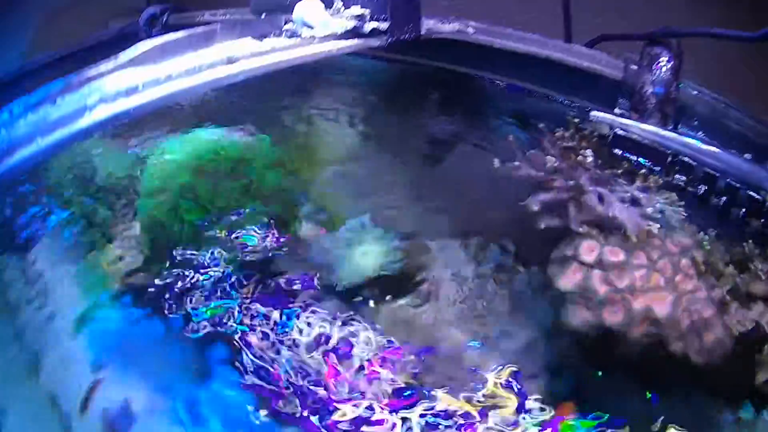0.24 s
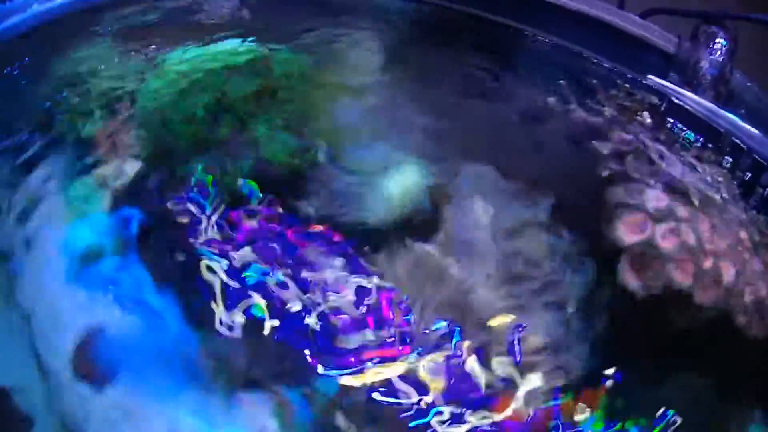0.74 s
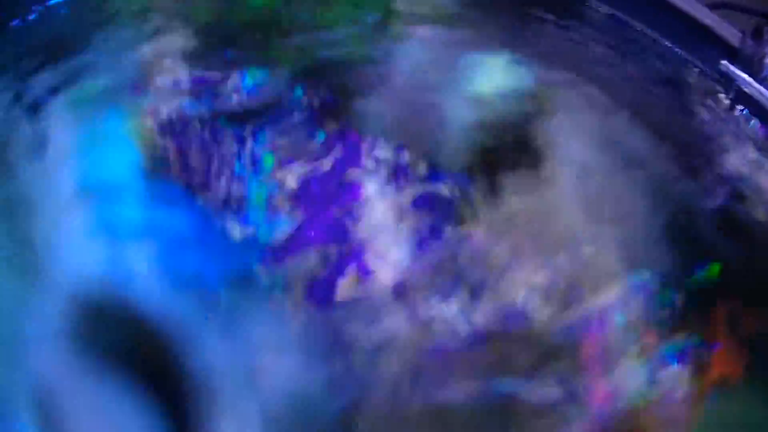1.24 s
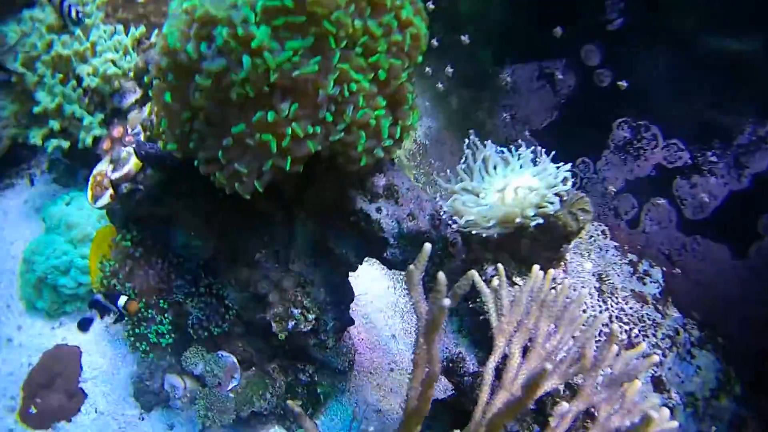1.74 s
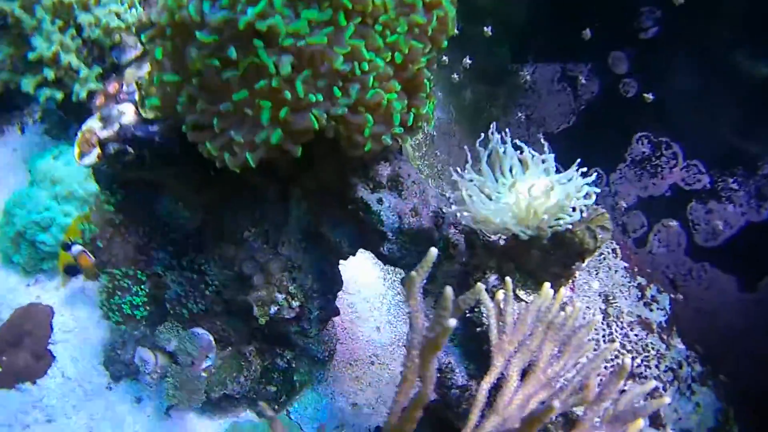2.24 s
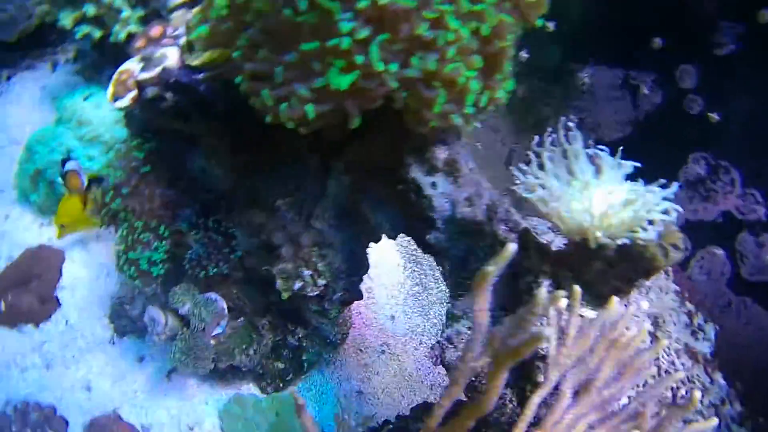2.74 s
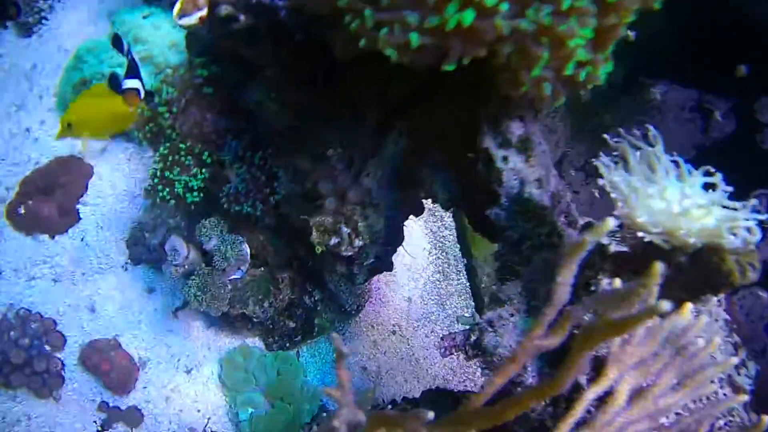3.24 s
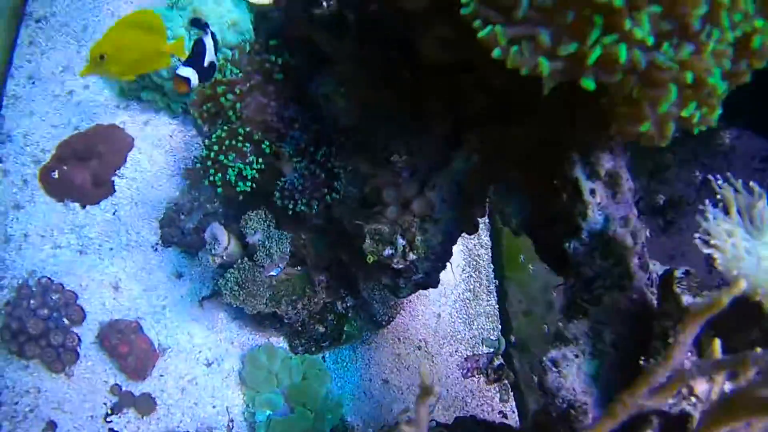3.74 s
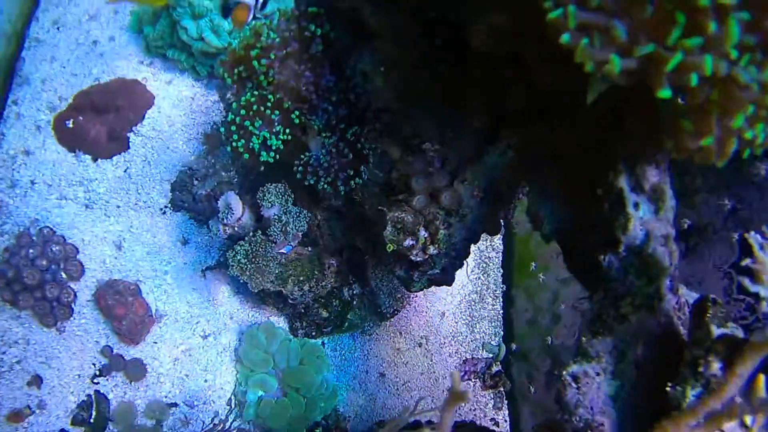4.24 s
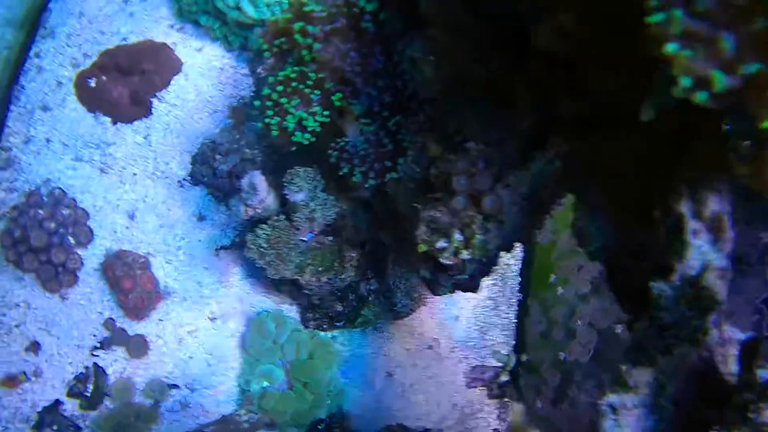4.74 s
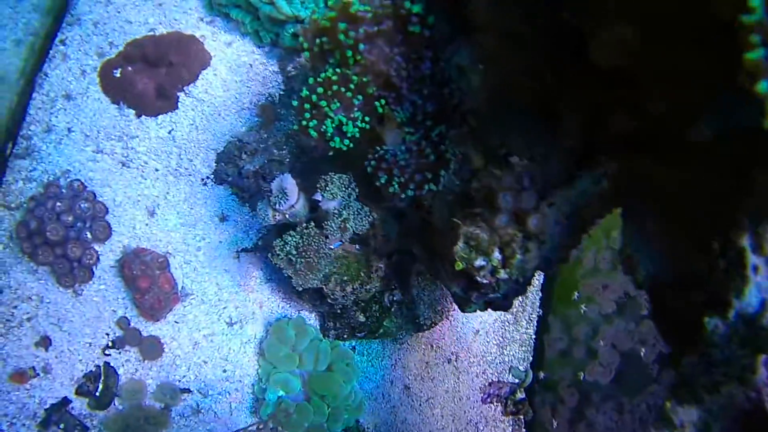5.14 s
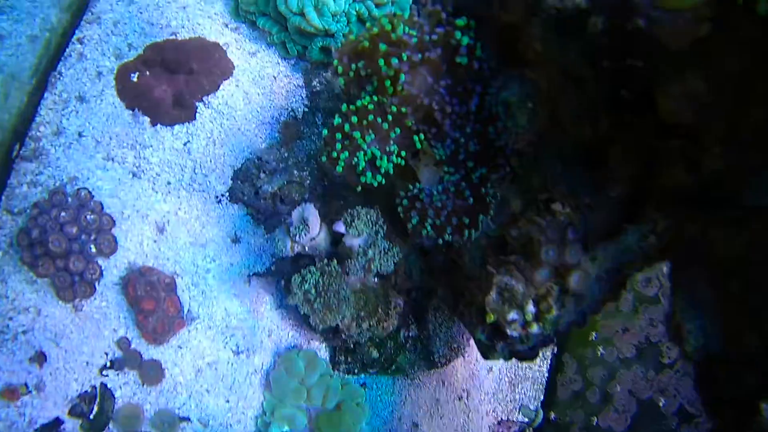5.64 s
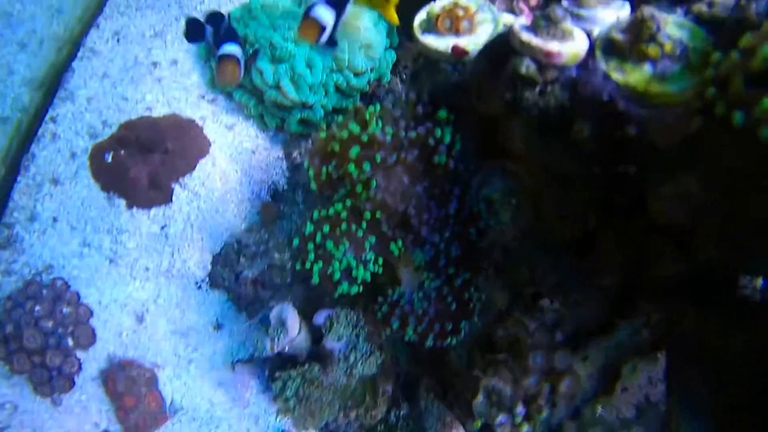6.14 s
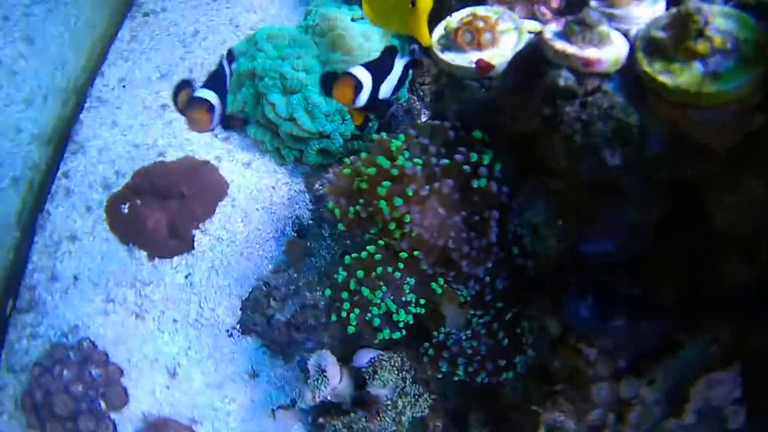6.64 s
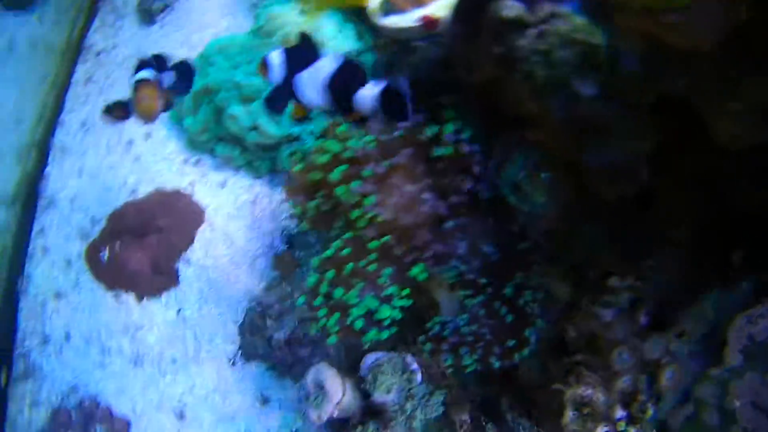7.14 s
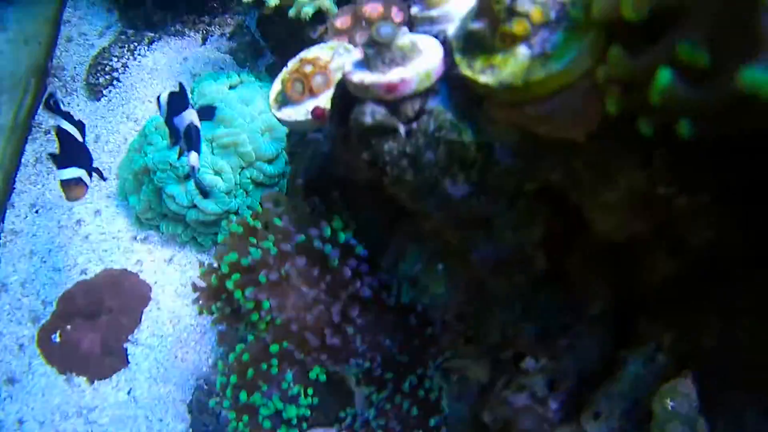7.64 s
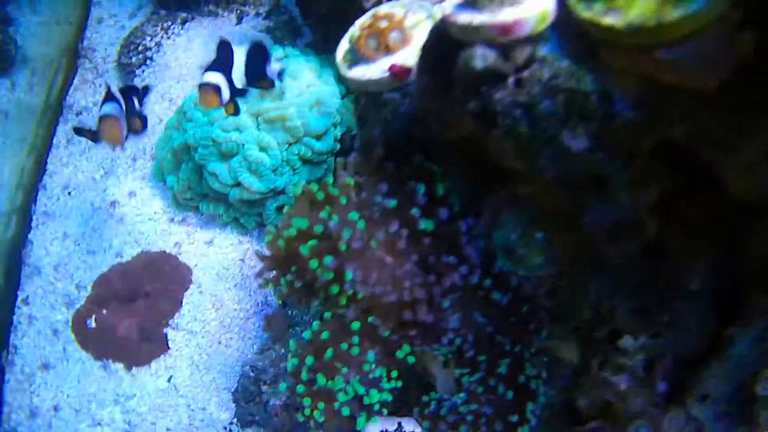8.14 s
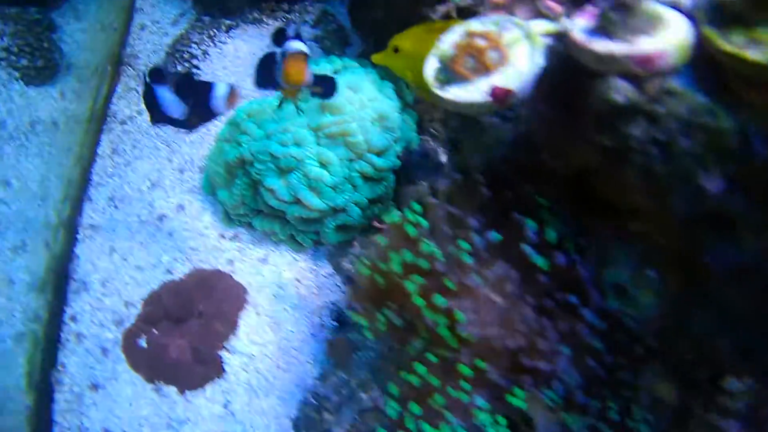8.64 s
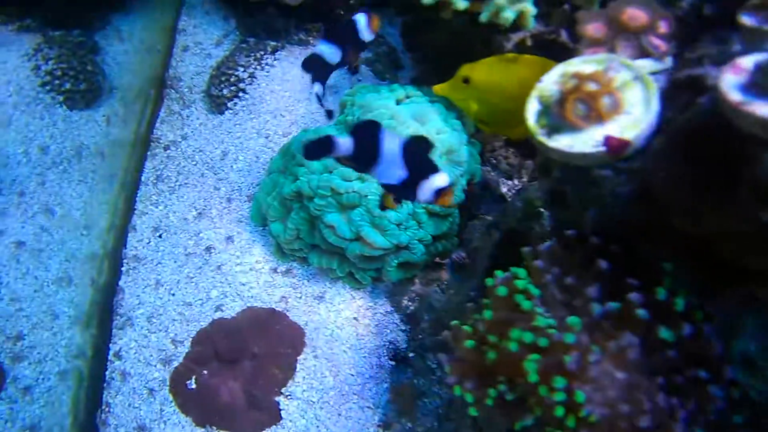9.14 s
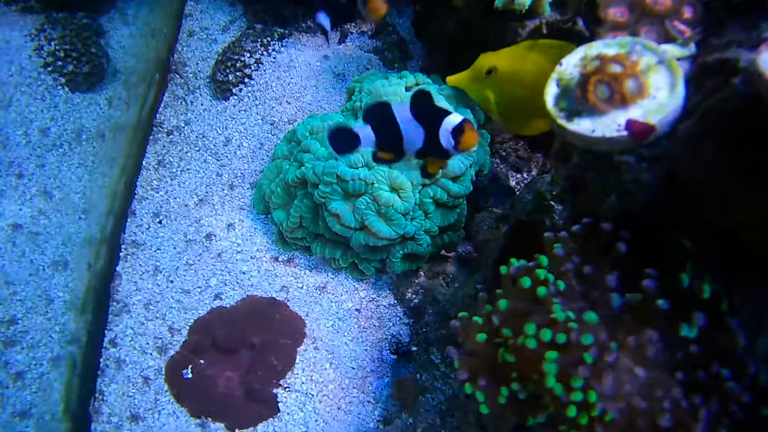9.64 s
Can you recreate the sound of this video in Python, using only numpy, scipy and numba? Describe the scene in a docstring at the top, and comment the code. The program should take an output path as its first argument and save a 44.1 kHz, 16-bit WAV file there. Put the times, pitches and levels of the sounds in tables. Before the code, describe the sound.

Heard from a waterproof camera sinking into a fish tank, a quiet surface trickle gives way to the muffled, growing hum of circulation pumps with a faint high whine. The case ticks and crackles as it submerges, then takes one loud hollow knock and a run of smaller knocks and finger rubs, all very close. Toward the end the hum dominates, with deep hand rumble, a low wash and one last bump.

```python
"""A circulation pump hums in a reef tank, swelling as a small sealed camera is lowered in by hand.
Its coil steps carry the tone and shake a faint whine from its casing. Trickling drips fade as the camera
sinks, and water loads the microphone membrane, whose resonance slides down. A second, unsteady pump,
rumble, wash and hiss fill the bed. Up close, the case ticks, jolts, rubs under the fingers, crackles
and knocks, ringing in its modes and rocking in the hand."""
import sys
import numpy as np
from scipy import signal
from scipy.fft import rfft, irfft
from scipy.io import wavfile
from scipy.ndimage import map_coordinates
from numba import njit

SR = 44100
rng = np.random.default_rng(int(sys.argv[2]) if len(sys.argv) > 2 else 0)


def unload_wav(signal):
    """Save mono or channel-first audio to the path in sys.argv[1] as 16-bit WAV at rate SR, clipped to [-1, 1]."""
    wavfile.write(
        sys.argv[1],
        SR,
        np.round(np.clip(np.atleast_2d(signal).T, -1, 1) * 32767).astype(np.int16),
    )


N = 435708

# The camera sinks and drifts: t/s, pump level/dB, membrane f/Hz, flow noise level/dB
SINKING = [(0, -72.5, 958, -76), (1.2, -70.5, 980, -91), (1.8, -67, 913, -69.5), (2.4, -63, 818, -74),
           (3.0, -55, 589, -63), (3.3, -51, 498, -62), (3.6, -46, 452, -49.5), (3.9, -42, 436, -47),
           (4.7, -38, 427.6, -45.5), (5.6, -31, 438.6, -45), (6.7, -28.5, 461, -46), (7.7, -34.5, 452, -49),
           (9.0, -28.5, 458, -45.5), (9.88, -27.5, 467.5, -43.5)]
# Pump hum, with the coil-step tone at order 12: shaft order, relative level/dB
SHAFT_ORDERS = [(4, -25.5), (5, -20), (9, -26), (10, -30.5), (11, -18), (12, -1), (13, -27), (14, -27),
                (15, -33.5), (16, -30.5), (17, -29), (24, -45.5), (28, -39.5), (36, -52)]
# The six coil steps in half a turn: strength/dB
COIL_STEPS = [5, -13.5, -8, -12, 0, -15]
# Pump casing resonances: f/Hz, nominal width/Hz, relative level/dB, steady share of the drive
CASING_MODES = [(4700, 420, -1, .6), (6000, 450, -4, .3), (6900, 420, -2, .2)]
# Ride of the second pump: t/s, level re the first pump/dB, f/Hz that the tank favours
DRONE_RIDE = [(2.7, -20, 380), (3.4, -6, 385), (4.4, -12, 385), (5.3, -12.5, 390), (6.0, -16.5, 465),
              (9.88, -15.5, 485)]
# Harmonics of the second pump: order, relative level/dB
DRONE_ORDERS = [(1, -7.5), (2, -13), (3, -10), (4, -11.5), (5, -2), (6, -6.5), (7, -0.5), (8, -17)]
# Rides of the hand rumble and the tank wash: t/s, level/dB
RUMBLE_RIDE = [(0, -45), (3.0, -45), (5.8, -42), (6.6, -36), (7.5, -40), (9.88, -43.5)]
WASH_RIDE = [(0, -61.5), (2.7, -58.5), (3.6, -50), (6, -37.5), (6.6, -44.5), (7.601, -50), (9.88, -47)]
# Air over the tank: t/s, level/dB, drip rate/(1/s)
AIR_RIDE = [(0, -71, 60), (1.3, -63.5, 44), (2.0, -64, 3), (3.1, -70, 3), (3.5, -75.5, 1), (4.0, -91, 1)]
# Noise colours of rumble, wash, air, hiss and dry rubbing: f/Hz, relative spectral level/dB
RUMBLE_COLOUR = [(8.2, -35), (14, -7.5), (27, -0.5), (48, 0.5), (68, -4.5), (91, -19), (128, -24),
                 (162, -29), (230, -37), (300, -64), (510, -120)]
WASH_COLOUR = [(60, -11.5), (75, -2), (95, -2.5), (130, 8), (155, -5.5), (205, -10.5), (300, -6.5),
               (380, -10.5), (490, -13.5), (515, -28.5), (555, -21.5), (610, -42.5), (900, -46.5),
               (2000, -58)]
AIR_COLOUR = [(290, -52), (500, -10), (946, 0.5), (1560, -18), (1900, -13.5), (2370, -24.5), (2820, -19.5),
              (3270, -28), (8000, -38.5), (10400, -72.5)]
HISS_COLOUR = [(600, 2.5), (900, -2.5), (2000, -10.5), (4000, -16), (5500, -19), (8000, -21.5),
               (11000, -21.5), (13500, -19.5), (15700, -20.5)]
DRY_RUB_COLOUR = [(120, -47), (200, -8), (237, -31), (260, -19), (453, -7), (743, -21.5), (936, 3),
                  (1200, -1.5), (1510, -23), (1660, -12.5), (2480, -17), (4660, -45.5), (6000, -50),
                  (6600, -46), (7200, -49), (10400, -82)]
# Pitches of the trickle: f/Hz
DRIP_PITCHES = [1300, 1690, 1900, 2150, 2780, 2800, 2860, 3510]
# The clearest drips and short pitched rings: t/s, peak/dB, f/Hz
PLINKS = [(0.078, -66, 2800), (0.19, -57, 2800), (0.335, -64, 2750), (0.405, -69, 1900), (0.598, -69, 1690),
          (0.713, -58, 1300), (0.845, -63, 1690), (0.847, -58, 1900), (0.917, -65, 2800),
          (1.035, -64, 1890), (1.113, -62, 4400), (1.17, -62, 2250), (1.268, -44.5, 2290),
          (1.312, -62, 1600), (1.793, -63, 3700), (1.826, -68, 3940), (1.885, -55, 1230),
          (2.325, -62, 2640), (2.606, -59, 1620), (2.926, -55.5, 1500), (3.157, -57, 1130),
          (3.425, -64, 2020)]
# Dull, main and upper modes of the case, and bright modes of its lid: f/Hz, relative level/dB, t60/s
DULL_MODES = [(179, -2, 0.086), (361.6, 2, 0.043)]
MAIN_MODES = [(443.3, -2, 0.087), (471, 1.5, 0.063), (517, -18, 0.017), (605, -19.5, 0.046)]
UPPER_MODES = [(776, 2.5, .025), (976, 9.5, 0.052), (1270, 11.5, 0.013), (1360, 13, 0.022),
               (1580, 14, 0.012), (1750, 6, 0.035), (1983, 3.5, 0.061), (2170, -12, 0.093),
               (2260, -15.5, 0.022), (2790, -2.5, 0.03), (2900, -7, 0.023), (2940, -9.5, 0.032),
               (3300, -14, 0.023), (3660, -11, 0.023)]
LID_MODES = [(3850, -4, 0.0039), (5500, 6, .005), (6600, 2.5, 0.0074), (9500, 11, 0.0028),
             (10950, -2, .003), (12600, -15, 0.0027)]
# Ticks on the case: t/s, body peak/dB, f/Hz, membrane peak/dB, crack peak/dB
TICKS = [(1.2669, -23, 2800, -38, -60), (1.712, -44, 3120, -57, -52), (1.734, -39, 2880, -48, -45),
         (1.7504, -44, 1190, -55, -76), (1.818, -28.5, 3100, -28, -59), (1.966, -41.5, 1600, -55, -80),
         (2.2763, -49, 1300, -49, -81), (2.461, -53, 2760, -59, -60), (2.48, -52, 3500, -67, -55),
         (2.487, -44.5, 2060, -45, -54), (2.73, -48, 1520, -32.5, -61), (2.813, -45.5, 2250, -59, -62),
         (2.823, -48, 1340, -60, -55), (2.901, -56, 2500, -62, -70), (3, -56, 2300, -54, -55),
         (3.053, -46.5, 1320, -64, -79), (3.103, -60, 2000, -45, -68), (3.122, -44.5, 2970, -38.5, -80),
         (3.139, -45, 1180, -45, -64), (3.154, -51, 1910, -55, -67), (3.2037, -48, 1740, -39.5, -72),
         (3.2286, -35, 1150, -33.5, -43.5), (3.243, -46.5, 3400, -36, -72), (3.264, -41, 1120, -37.5, -70),
         (3.3322, -46, 3200, -58, -46), (3.4116, -25, 1460, -37, -85), (3.417, -35, 1270, -37, -90),
         (3.457, -44, 1620, -48, -61), (6.505, -51, 1900, -35, -79)]
# Faint tail of the first tick: f/Hz, level/dB
TICK_TAIL = [(2500, -66), (2750, -65), (3000, -63), (3350, -62), (3900, -69)]
# Soft pushes on the case: t/s, peak/dB, t60/s
JOLTS = [(1.37, -20.5, 0.061), (1.656, -30.5, 0.028), (2.582, -27, 0.27), (3.166, -30, 0.33),
         (3.222, -27, 0.3)]
# Finger strokes: t/s, length/s, level/dB, rasp re level/dB, shudder crest t/s, shudder level/dB
RUBS = [(1.375, 0.06, -41, 2, 1.385, -39), (1.439, 0.26, -45, 1.5, 1.6, -46.5),
        (3.736, 0.025, -59, -1, 3.741, -29), (4.136, 0.01, -61, -1.5, 4.154, -22.5),
        (5.01, 0.028, -62, -5.5, 5.02, -32), (5.44, 0.11, -58, -7, 5.468, -27.5),
        (5.584, 0.065, -58, -3, 5.63, -36), (5.671, 0.15, -58.5, -6, 5.709, -24.5),
        (5.827, 0.073, -60, 0.5, 5.845, -24.5), (5.955, 0.0094, -66, 2.5, 5.95, -21),
        (5.99, 0.051, -59.5, -3, 6.035, -20.5), (6.18, 0.037, -67, 1, 6.22, -20.5),
        (6.232, 0.047, -68.5, -6, 6.26, -46), (6.48, 0.092, -67.5, 2.5, 6.56, -30.5),
        (6.764, 0.062, -61.5, 5.5, 6.79, -36), (6.981, 0.13, -74, -2, 6.99, -45.5),
        (9.322, 0.037, -63.5, -14, 9.334, -28)]
# Knocks: t/s, main/dB, dull/dB, upper/dB, hardness/(dB/octave), slow sway/dB, quick sway/dB
KNOCKS = [(3.688, -0.14, -12, -22.5, -19, -41, -10), (3.727, -8, -25.5, -33.5, -8, -26, -21),
          (4.138, -11, -20.5, -44.5, -7, -7.5, -18), (4.147, -14.5, -20.5, -50, -17, -28, -40),
          (4.976, -15.5, -42, -39, -15, -44, -17.5), (5.003, -28, -30.5, -49.5, -11, -60, -26.5),
          (5.431, -26, -37, -43, -7, -43, -20), (5.587, -24, -27, -48, -12, -55, -51.5),
          (5.675, -24, -55, -45, -2, -50, -22), (5.802, -34, -30.5, -59.5, -9, -39, -26),
          (5.841, -39, -30, -41, 7, -27, -34.5), (5.95, -27, -44, -45, -12, -39.5, -15),
          (5.996, -18.5, -22.5, -36.5, -15, -37, -36), (6.147, -13, -15, -35, -11, -61, -11),
          (6.187, -31, -29, -46, 1, -37, -31), (6.443, -27.5, -35, -43, -10, -43, -53.5),
          (6.54, -26.5, -29.5, -42, 1, -51, -34), (6.697, -6.5, -8, -23, -11, -18, -15.5),
          (6.709, -24, -33, -38, 6.5, -58, -25.5), (6.975, -30, -33.5, -55, -20.5, -52, -42.5),
          (9.326, -26, -28.5, -47.5, -24.5, -25, -42)]
# The case rocking in the hand, slow then quick: f/Hz, t60/s, delay/s
SWAY_MODES = [(62.7, 0.18, 0.012), (122.2, 0.14, 0.012)]


def from_db(db):
    """Gain of a dB value."""
    return 10 ** (np.asarray(db) / 20)


def rms_one(x):
    """Scaled to rms 1."""
    return x / np.sqrt(np.mean(x ** 2) + 1e-30)


def peak_one(x):
    """Scaled to peak 1."""
    return x / np.max(np.abs(x))


def curves(rows, outside=None):
    """Breakpoint rows as automation curves, one per column after the time."""
    s, *columns = np.transpose(rows)
    return [np.interp(np.arange(N) / SR, s, column, outside, outside) for column in columns]


def coloured(spectrum):
    """Noise of the given colour, falling 40 dB in the octave past each end; rms 1."""
    hz, db = np.transpose(spectrum)
    log_hz = np.log(np.arange(1, N // 2 + 2) * SR / N)
    shape_db = np.interp(log_hz, np.log([hz[0] / 2, *hz, hz[-1] * 2]), [db[0] - 40, *db, db[-1] - 40])
    return rms_one(irfft(rfft(rng.standard_normal(N)) * from_db(shape_db), N))


def drift(per_s):
    """Smooth random modulation with a spread of about 1."""
    knots = rng.standard_normal(400)
    return map_coordinates(knots, [np.arange(N) / SR * np.clip(per_s, .1, 39)], order=3)


def accents(cap):
    """A random accent per sample: mostly small, now and then up to the cap."""
    return np.minimum(rng.exponential(1, N), cap)


def click(s=0):
    """A unit click, s seconds into a short silence."""
    return (np.arange(SR // 3) == round(s * SR)) * 1.0


def ring(x, hz, t60):
    """A resonator: a unit click starts a decaying sine of height 1."""
    r, w = from_db(-60 / (t60 * SR)), 2 * np.pi * hz / SR
    return signal.lfilter([0, np.sin(w)], [1, -2 * r * np.cos(w), r * r], x + 1e-18)


@njit
def sliding_ring(x, cos_w, r):
    """A resonance whose centre and width move; gain about 1 on top."""
    y = np.zeros(len(x))
    for i in range(2, len(x)):
        y[i] = (1 - r[i]) * (x[i] - x[i - 2]) + 2 * r[i] * cos_w[i] * y[i - 1] - r[i] ** 2 * y[i - 2]
    return y


def struck(force, modes, scatter_db):
    """A force rings a bank of modes, their levels scattered at random."""
    return sum(from_db(db + scatter_db * rng.standard_normal()) * ring(force, hz, t60)
               for hz, db, t60 in modes)


def soften(x, ms):
    """Rounds off an attack with two one-pole low-passes."""
    r = np.exp(-1000 / (ms * SR))
    return signal.lfilter([(1 - r) ** 2], [1, -2 * r, r * r], x + 1e-18)


def butter(x, hz, order, kind="band"):
    """Butterworth filter, band-pass by default."""
    return signal.sosfilt(signal.butter(order, hz, kind, fs=SR, output="sos"), x + 1e-18)


def add(out, s, sound):
    """Mixes a sound in at time s."""
    at = round(s * SR)
    out[at:at + len(sound)] += sound


def pump(shaft_hz=22.06, steps_per_turn=12):
    """Shaft orders hum, and each coil step shakes a faint whine from the casing."""
    turns = np.arange(N) / SR * shaft_hz + 0.017 * drift(1.5)
    hum = np.zeros(N)
    for order, db in SHAFT_ORDERS:
        waver_db = drift(1.8) * (order != steps_per_turn)
        hum += from_db(db + waver_db) * np.sin(2 * np.pi * (order * turns + rng.random()))
    step = turns * steps_per_turn % len(COIL_STEPS)
    shake = from_db(COIL_STEPS)[step.astype(int)] * np.exp(-2.2 * (step % 1))
    whine = sum(from_db(db) * rms_one(ring((shake + steady) * rng.standard_normal(N), hz, 4.3 / width))
                for hz, width, db, steady in CASING_MODES)
    level_db = curves(SINKING)[0]
    return np.sqrt(2) * from_db(level_db) * hum + from_db(0.52 * level_db - 67.5) * rms_one(whine)


def membrane_flow():
    """Flow noise through the membrane, whose resonance slides down as water loads it."""
    _, hz, level_db = curves(SINKING)
    cos_w = np.cos(2 * np.pi * hz / SR)
    radius = np.exp(-np.pi * (.75 * hz - 200) / SR)
    flow = rng.standard_normal(N)
    for _ in range(4):  # four passes for steep flanks
        flow = sliding_ring(flow, cos_w, radius)
    notch_w = 2 * np.pi * 1.14 * hz / SR  # just above the resonance
    flow -= sliding_ring(flow, np.cos(notch_w), np.exp(-.09 * notch_w))
    return from_db(level_db + 2.2 * drift(14)) * rms_one(flow)


def second_pump(shaft_hz=69.25, favour_width_hz=118):
    """A fluttering drone on one unsteady rotation; the tank favours some of its upper orders."""
    pump_db = curves(SINKING)[0]
    relative_db, favoured_hz = curves(DRONE_RIDE)
    turns = shaft_hz * np.arange(N) / SR + .04 * drift(2.2) + 0.011 * drift(8.9)
    drone = np.zeros(N)
    for order, db in DRONE_ORDERS:
        loss_db = 10 * ((order * shaft_hz - favoured_hz) / favour_width_hz) ** 2 * (order > 4)
        gain = from_db(db - loss_db + 2 * drift(11))
        drone += gain * np.sin(2 * np.pi * (order * turns + rng.random()))
    return np.sqrt(2) * from_db(pump_db + relative_db) * drone


def hand_rumble():
    """Deep, restless noise from the hand holding the case."""
    return from_db(curves(RUMBLE_RIDE)[0] + 2.2 * drift(7)) * coloured(RUMBLE_COLOUR)


def tank_wash():
    """The low, gently wavering wash of the water."""
    return from_db(curves(WASH_RIDE)[0] + drift(3.9)) * coloured(WASH_COLOUR)


def air_and_trickle():
    """Room tone above the surface, with a fine trickle of short ringing drips."""
    level_db, per_s = curves(AIR_RIDE)
    drops = (rng.random(N) < per_s / SR) * from_db(1.3 * accents(3))
    pitch_index = rng.integers(0, len(DRIP_PITCHES), N)
    trickle = np.zeros(N)
    for k, hz in enumerate(DRIP_PITCHES):
        drips = ring(drops * (pitch_index == k) * hz / SR * 16, hz, 60 / hz)
        trickle += ring(drips, hz, 6 / hz)  # rounds the attack
    return from_db(level_db) * (coloured(AIR_COLOUR) + from_db(-19.5) * trickle)


def microphone_hiss(level_db=-72):
    """The steady noise floor of the microphone."""
    return from_db(level_db) * coloured(HISS_COLOUR)


def plinks(t60_cycles=115, echo_s=.046, echo_db=-7):
    """Clear drips and short rings after ticks each hold one pitch and return twice, weaker each time."""
    out = np.zeros(N)
    taps = sum(from_db(k * echo_db) * click(k * echo_s) for k in range(3))
    for s, db, hz in PLINKS:
        tone = ring(taps, hz, t60_cycles / hz)
        add(out, s, from_db(db) * peak_one(ring(tone, hz, 8 / hz)))
    return out


def ticks(t60=0.008):
    """A noise burst rings the case; the membrane rings along and the lid adds a bright crack."""
    out, t = np.zeros(N), np.arange(4000) / SR
    sink_s, _, sink_hz, _ = np.transpose(SINKING)
    for s, db, hz, membrane_db, crack_db in TICKS:
        body_noise, lid_noise = rng.standard_normal((2, len(t)))
        burst = body_noise * from_db(-60 * t / (1.7 * t60))
        tone = peak_one(ring(burst, hz, t60))
        snap = peak_one(butter(burst, (hz / 2.7, hz * 1.32), order=4))
        body = peak_one(butter(tone + 3.7 * snap, (700, 4500), order=4))
        body += from_db(-15) * peak_one(struck(burst, UPPER_MODES, scatter_db=2.8))
        membrane_hz = np.interp(s, sink_s, sink_hz)
        membrane = ring(ring(t == 0, membrane_hz, t60=0.022), membrane_hz, t60=0.00071)
        crack = struck(lid_noise * np.exp(-t / .0008), LID_MODES, scatter_db=6)
        add(out, s, from_db(db) * peak_one(body) + from_db(membrane_db) * peak_one(membrane)
            + from_db(crack_db) * peak_one(crack))
    add(out, TICKS[0][0], sum(from_db(db) * ring(click(), hz, t60=.2) for hz, db in TICK_TAIL))
    return out


def jolts(hz=65):
    """A soft push rocks the case with a low thump."""
    out = np.zeros(N)
    push = soften(click(), ms=0.66)
    for s, db, t60 in JOLTS:
        add(out, s, -from_db(db) * peak_one(ring(push, hz, t60)))
    return out


def skin_friction(sunk_s=2.5):
    """Skin slips over plastic: dry noise in air, then gritty noise in the modes of the sunken case."""
    grain = rng.standard_normal(N) * from_db(2.5 * drift(38) + 5.5 * accents(4))
    hollow_modes = [(hz, db, 2.2 * t60) for hz, db, t60 in UPPER_MODES]  # fingers damp less than a blow
    upper = butter(struck(np.diff(grain, prepend=0), hollow_modes, scatter_db=0), (700, 3870), order=9)
    lower = butter(struck(grain, MAIN_MODES, scatter_db=0), (180, 700), order=4)
    sunken = rms_one(upper) + from_db(24) * rms_one(lower)
    in_air = from_db(2 * drift(34.97)) * coloured(DRY_RUB_COLOUR)
    return np.where(np.arange(N) < sunk_s * SR, in_air, sunken)


def rubs(grip_s=0.0065, release_s=0.034, edge_db=32.5, rasp_hz=1900, shudder_hz=108):
    """Finger strokes play the friction, smooth below and raspy on top, as the case shudders."""
    skin = skin_friction()
    pressure, rasp, shake = np.zeros((3, N))
    for s, length, db, rasp_db, crest_s, shudder_db in RUBS:
        start, end = s - grip_s, s + length + release_s
        stroke_shape = [(start, db - edge_db), (s, db), (s + length, db), (end, db - edge_db)]
        shudder_shape = [(start, shudder_db - 14.5), (crest_s, shudder_db), (end, shudder_db - 16)]
        stroke = from_db(curves(stroke_shape, outside=-120)[0])
        pressure += stroke
        rasp += stroke * from_db(rasp_db)
        shake += from_db(curves(shudder_shape, outside=-120)[0])
    smooth = soften(pressure, ms=1) * butter(skin, rasp_hz, order=3, kind="low")
    rough = soften(rasp, ms=2) * butter(skin, rasp_hz, order=3, kind="high")
    cycles = shudder_hz * np.arange(N) / SR + 0.037 * drift(21)
    shudder = soften(shake, ms=2.2) * np.sqrt(2) * np.sin(2 * np.pi * cycles)
    return smooth + rough + shudder


def crackle(start_s=1.7, end_s=3.5, per_s=76, softest_db=-70):
    """Tiny random snaps as the case goes under, each in one mode of the case or its lid."""
    t = np.arange(N) / SR
    onsets = (rng.random(N) < per_s / SR) * (t > start_s) * (t < end_s)
    snaps = onsets * from_db(softest_db + 6 * accents(3))
    modes = UPPER_MODES[2:] + LID_MODES[:1]
    mode_index = rng.integers(0, len(modes), N)
    return sum(ring(snaps * (mode_index == k), hz, 13 / hz) for k, (hz, _, _) in enumerate(modes))


def knocks(detune=.015):
    """A blow blooms in the low modes, its rough contact drives the upper ones, and the sway follows."""
    out, t = np.zeros(N), np.arange(SR // 3) / SR
    slow_sway, quick_sway = (-peak_one(ring(soften(click(delay), ms=1.5), hz, t60))
                             for hz, t60, delay in SWAY_MODES)
    for s, main_db, dull_db, upper_db, hardness, slow_db, quick_db in KNOCKS:
        main = butter(struck(click(), MAIN_MODES, scatter_db=3.5), (350, 650), order=2)
        dull = butter(struck(click(), DULL_MODES, scatter_db=4.3), (210, 350), order=2)
        contact = rng.standard_normal(len(t)) * np.exp(-t / 0.0026)
        # the grip detunes the upper modes from blow to blow
        gripped_modes = [(hz * rng.normal(1, detune), db + hardness * np.log2(hz / 1500), t60)
                         for hz, db, t60 in UPPER_MODES]
        upper = butter(struck(contact, gripped_modes, scatter_db=2.5), (700, 3870), order=9)
        body = from_db(main_db) * peak_one(main) + from_db(dull_db) * peak_one(dull)
        sway = from_db(slow_db) * slow_sway + from_db(quick_db) * quick_sway
        add(out, s, body + from_db(upper_db) * peak_one(upper) + sway)
    return out


def scene():
    """A mono mix: close handling over the tank bed, the surface and the hiss."""
    handling = knocks() + jolts() + ticks() + crackle() + rubs()
    tank = pump() + membrane_flow() + second_pump() + hand_rumble() + tank_wash()
    surface = air_and_trickle() + plinks()
    return (handling + tank + surface + microphone_hiss())[None]


def record(dry, low_cut_hz=14, high_cut_hz=15700):
    """The deepest bass is dropped, peaks meet a hard ceiling, the top is cut."""
    trimmed = butter(dry, low_cut_hz, order=2, kind="high")
    limited = trimmed / (1 + trimmed ** 50) ** (1 / 50)
    return signal.sosfilt(signal.ellip(12, .5, 70, high_cut_hz, fs=SR, output="sos"), limited)


dry = scene()
out = record(dry)
unload_wav(out)
```